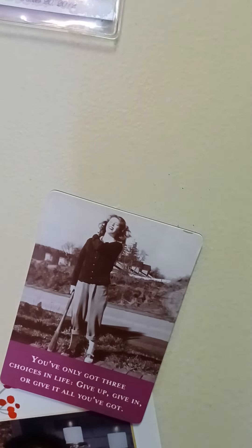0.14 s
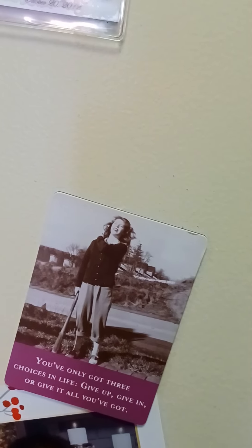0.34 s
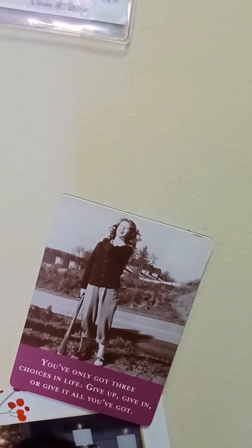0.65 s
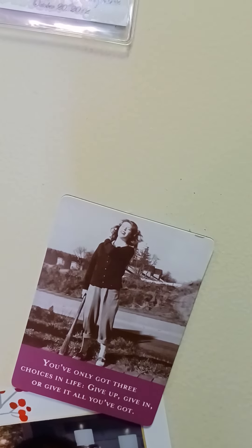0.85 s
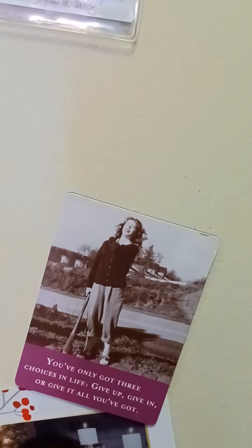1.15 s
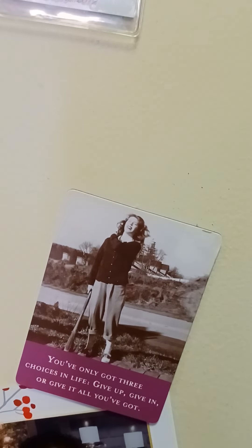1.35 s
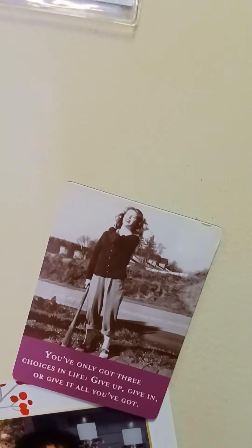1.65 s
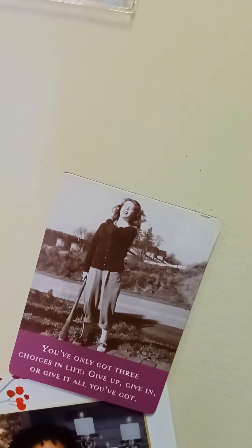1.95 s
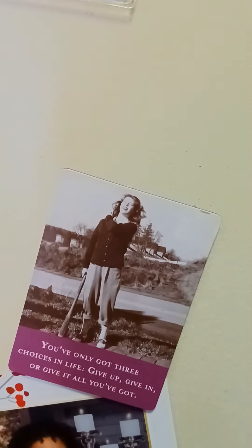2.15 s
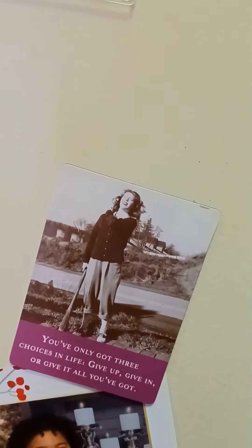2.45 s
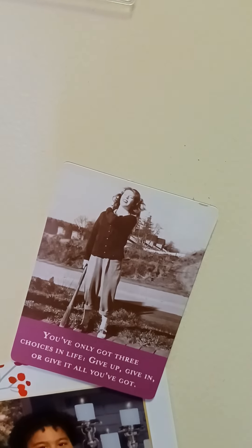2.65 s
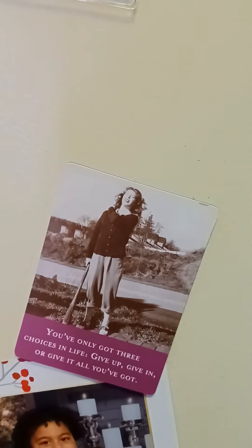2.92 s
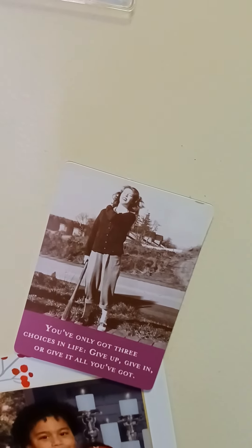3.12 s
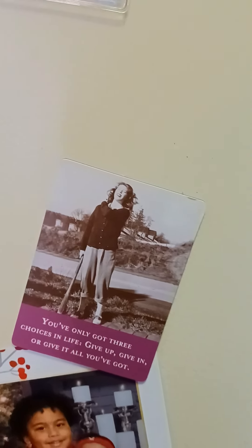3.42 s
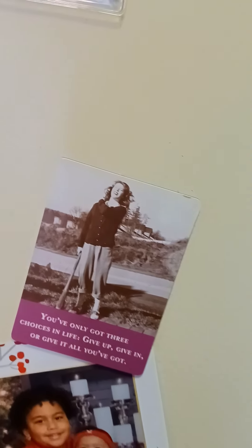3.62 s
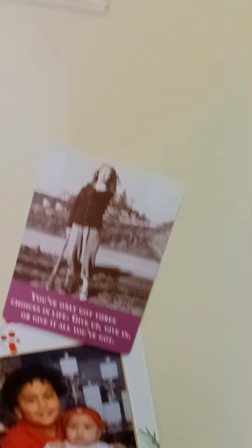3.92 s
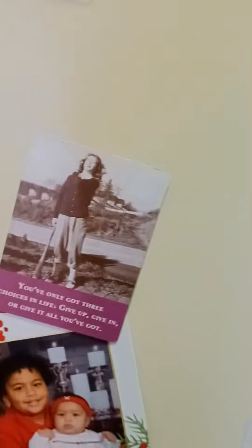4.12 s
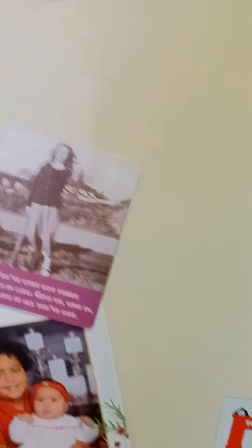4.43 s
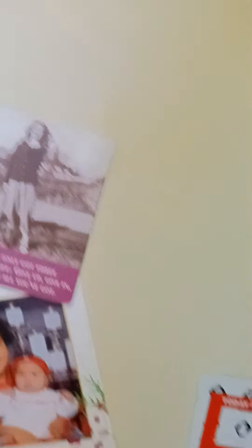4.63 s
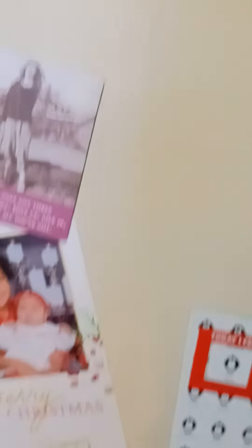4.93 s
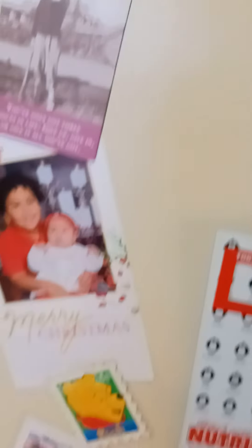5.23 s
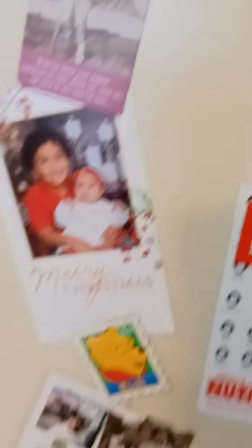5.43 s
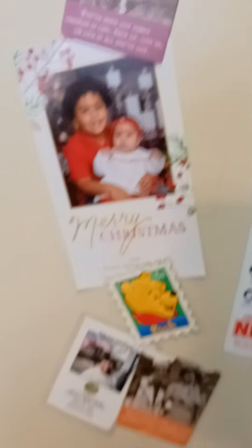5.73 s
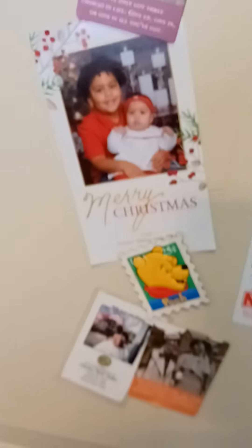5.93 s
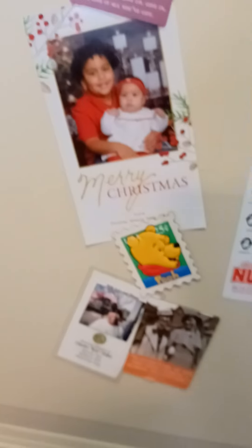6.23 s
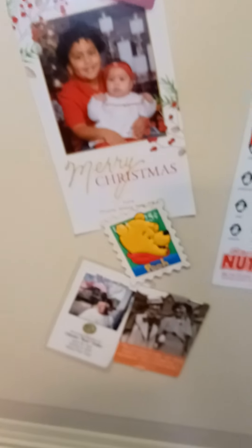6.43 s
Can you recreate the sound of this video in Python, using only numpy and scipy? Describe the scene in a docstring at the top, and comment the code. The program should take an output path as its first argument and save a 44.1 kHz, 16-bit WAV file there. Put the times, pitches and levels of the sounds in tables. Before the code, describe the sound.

A refrigerator hums with a low wavering drone in a quiet kitchen while brief shoe scuffs and gritty ticks sound midway, then only the hum remains.

```python
"""A refrigerator runs in a quiet kitchen: fan orders locked to one rotation make a wavering blade-tone hum,
wavering sines the motor and mains buzz, shaped noise the low air rush and faint hiss.
From 3.6 s someone to the right shuffles: noise under stroke envelopes scuffs, struck resonances tick as grit.
Amid this, near 4.8 s, the low rumble swells once; faint motor whines surge at 5.3 and 5.7 s.
The scuffs die out soon after 5.6 s and the refrigerator runs on."""
import sys
import numpy as np
from scipy import signal
from scipy.fft import rfft, irfft
from scipy.io import wavfile

SR = 44100
rng = np.random.default_rng(int(sys.argv[2]) if len(sys.argv) > 2 else 0)


def transcribe(u):
    """Save the signal u as a 16-bit wav file named by the first command-line argument.

    u: samples, shape (n,) or (channels, n), limited to [-1, 1]; the rate is SR.
    q: integer samples, one column per channel.
    """
    v = np.clip(np.atleast_2d(u).T, -1, 1)
    q = np.round(v * 32767).astype(np.int16)
    wavfile.write(sys.argv[1], SR, q)


N = 289737
TIME = np.arange(N) / SR
HZ = np.maximum(np.fft.rfftfreq(N, 1 / SR), 1)


def amp(db):
    """dB to gain."""
    return 10 ** (np.asarray(db) / 20)


def rms_one(x):
    """Scale so that the mean of the channels has rms 1."""
    mono = np.atleast_2d(x).mean(axis=0)
    return x / np.sqrt(np.mean(mono ** 2) + 1e-20)


def in_time(rows):
    """Columns of a (seconds, ..) curve at every sample."""
    s, *columns = np.transpose(rows)
    return [np.interp(TIME, s, column) for column in columns]


def at_hz(points):
    """A (Hz, value) curve on the frequency grid, linear in log frequency."""
    hz, value = np.transpose(points)
    return np.interp(np.log(HZ), np.log(hz), value)


def coloured(x, gain):
    """Filter by a gain on the frequency grid."""
    return irfft(rfft(x) * gain, N)


def drift(rate_hz):
    """Slow random wander of rms 1: white noise low-passed near rate_hz."""
    return rms_one(coloured(rng.standard_normal(N), 1 / (1 + (HZ / rate_hz) ** 2)))


def sided(left_right_db):
    """Left and right gains for a left-right level difference."""
    half_db = np.atleast_1d(left_right_db) / 2
    return np.stack([amp(half_db), amp(-half_db)])


def tone(phase, rms_db, pan_db=0, lead_rad=.23):
    """A sine of the given level from a random start phase; the left channel leads in phase."""
    start = rng.uniform(0, 2 * np.pi)
    wave = np.sin(phase + start + [[lead_rad], [0]])
    return np.sqrt(2) * amp(rms_db) * wave * sided(pan_db)


def resonance(x, hz, width_hz):
    """Two-pole ring: a unit click rings with height about 1 and decays at the rate its width gives."""
    r = np.exp(-np.pi * width_hz / SR)
    w = 2 * np.pi * hz / SR
    return signal.lfilter([0, np.sin(w)], [1, -2 * r * np.cos(w), r * r], x)


def reflections(t60_s):
    """Dense echoes of a small room: decaying noise, independent per channel, energy 1."""
    age = np.arange(SR // 3) / SR
    tail = rng.standard_normal((2, len(age))) * amp(-60 * age / t60_s)
    return tail / np.sqrt(np.sum(tail ** 2, axis=1, keepdims=True))


def fan():
    """Blade tone, weaker shaft orders locked to the same rotation, and turbulence round the blade tone."""
    # Blade-tone pitch. Each row: time in seconds, frequency in Hz.
    blade_hz = [(0, 133.13), (3.0, 133.13), (3.5, 132.88), (5.4, 132.9), (6.57, 133.03)]
    # Blade-tone level before waver. Each row: time in seconds, rms level in dB.
    blade_level = [(0.0, -44.5), (0.03, -38.5), (0.44, -40.5), (0.49, -35.5), (0.57, -38.5), (0.8, -37),
                   (0.86, -41.5), (1.06, -34.5), (1.66, -38.5), (1.76, -34.5), (1.96, -37.5), (2.01, -44),
                   (2.12, -36), (2.23, -35.5), (2.45, -38.5), (2.53, -52), (2.58, -41.5), (2.76, -38),
                   (3.24, -36), (3.27, -41.5), (3.5, -37.5), (4.21, -37), (4.35, -35), (4.5, -37),
                   (4.55, -47), (4.68, -36.5), (4.98, -35), (5.05, -42.5), (5.56, -35), (5.76, -40),
                   (5.87, -48), (5.93, -35.5), (6.06, -44.5), (6.17, -37), (6.44, -40.5), (6.57, -37)]
    # Shaft orders. Each row: multiple of the turning rate, mean rms level in dB, left-right in dB.
    shaft_orders = [(6, -64, 2), (8, -60, .6), (10, -62, 1.4), (12, -62, -2.3), (14, -73, -1.6),
                    (22, -75, 2), (24, -76, .4), (33, -80, -4)]
    blades = 11
    waver_db, waver_hz = 0.96, 7.4
    flutter_hz, flutter_width_hz, flutter_rms_db = 133, 12, -56

    turn = 2 * np.pi * np.cumsum(in_time(blade_hz)[0]) / SR / blades
    blade_phase = blades * turn + 0.05 * drift(24)
    blade_db = in_time(blade_level)[0] + waver_db * drift(waver_hz)
    out = tone(blade_phase, blade_db, pan_db=-0.96)
    for order, db, pan_db in shaft_orders:
        out += tone(order * turn, db + 0.5 * drift(2.6), pan_db)
    flutter_band = 1 / (1 + ((HZ - flutter_hz) / flutter_width_hz) ** 2)
    flutter = rms_one(coloured(rng.standard_normal(N), flutter_band))
    return out + amp(flutter_rms_db) * flutter


def strokes(rows, rise_share=1, fall_share=1, late_db=0):
    """Stereo gain of a group of strokes: each rises, holds, falls and leaves a room tail; their powers add.

    late_db is the climb, in dB at the nominal rise, by which the top is delayed."""
    tail_db, tail_fall_db_per_s = -18, 241
    power = np.zeros((2, N))
    for s, db, rise, hold, fall, pan_db in rows:
        age = TIME - s - late_db / rise
        early = np.maximum(-age, 0)
        late = np.maximum(age - abs(hold), 0)
        direct = amp(db - rise_share * rise * early - fall_share * fall * late) * sided(pan_db)
        tail = (age > 0) * amp(db + tail_db - tail_fall_db_per_s * late)
        power += direct ** 2 + tail ** 2
    return np.sqrt(power)


def scuffs():
    """Sole friction as dense noise grains; in each stroke the treble tops first, the body of the sole last."""
    # Strokes of the sole, grouped by stretches of like colour. Each row: nominal top in seconds,
    # level in dB, nominal rise in dB/s, hold in seconds, nominal fall in dB/s, left-right in dB.
    stroke_groups = [
        [(3.644, -86, 262, .02, 202, -2), (3.678, -74.5, 500, .003, 352, -2), (3.83, -80, 56, 0.023, 293, 0)],
        [(3.905, -63.5, 204, 0.047, 300, -4)],
        [(4.272, -50, 545, 0.014, 378, -2), (4.37, -76, 100, .03, 200, -1)],
        [(4.412, -69, 398, .008, 190, 1), (4.566, -75, 160, .005, 113, 0.1), (4.68, -89, 181, .01, 401, 3)],
        [(4.692, -57.5, 6000, 0.0022, 260, -.5), (4.745, -70, 802, 0.0044, 301.5, -3),
         (4.96, -82, 19.5, .01, 299.5, -4)],
        [(5.0, -69, 496, 0.11, 202, -4.5), (5.15, -53.5, 168, 0.0054, 305, -3.5),
         (5.183, -51.5, 400, 0.004, 600, 0.5)],
        [(5.362, -67.5, 2500, 0.025, 197, 2), (5.42, -62.5, 232, 0.016, 600, -1)],
        [(5.448, -46, 498, 0.025, 373, 0), (5.56, -68.5, 300, 0.0035, 208, -3)],
    ]
    # Colour of each stretch of scuffing. Each row: frequency in Hz, relative density in dB.
    stretch_colours = [
        [(2000, -26.5), (3000, -7), (4500, -14), (6000, -8), (7500, 3.5), (9000, -6), (15600, -12)],
        [(710, -32.5), (1200, -8.5), (1780, -4), (2570, -8.5), (3020, -3), (4160, -8.5), (7430, -2), (9300, -7),
         (13000, -10), (15600, -5.5)],
        [(350, -35), (600, -7), (716, -7), (767, -20), (843, -5.5), (993, -14), (1340, -4), (1910, -3),
         (2340, -4.5), (2950, -4.5), (5840, -11), (10600, -15), (12200, -15), (15600, -17)],
        [(820, -32), (1400, -2.5), (1630, -2.5), (2230, -14), (2410, -11), (2640, -15), (4030, -14.5),
         (7460, -9.5), (9500, -18), (15600, -16.5)],
        [(760, -37.5), (1300, -8.5), (1620, -1.5), (2230, -10.5), (2480, -9.5), (6050, -2.5), (7210, 0.5),
         (9450, -7.5), (11500, -8), (15600, -17)],
        [(760, -50.5), (1300, -15.5), (1540, -2.5), (2030, 3.5), (2370, -2), (3450, 0.5), (5740, -10.5),
         (7440, -6), (9070, -12), (13500, -11), (15600, -11.5)],
        [(820, -46), (1400, -7.5), (1640, -17.5), (1950, 3), (2440, -26.5), (2920, -26), (3010, -2),
         (3170, -0.5), (4280, -11), (7610, -7), (15600, -21)],
        [(470, -48), (800, -20), (1350, -11.5), (1470, -21.5), (1710, -4.5), (2480, -8.5), (2980, -6),
         (3870, -2), (5760, -7), (6130, -8.5), (7390, -8), (8790, -12.5), (13100, -17), (15600, -20.5)],
    ]
    # Shading, mostly of the left channel. Each row: frequency in Hz, left-right in dB.
    side_shade = [(1500, -3), (3000, -3.2), (6000, 1.5), (8000, -2), (10000, -4), (15000, -8.5)]
    treble_hz, body_hz = 6000, 2500

    out = np.zeros((2, N))
    shade = sided(at_hz(side_shade))
    treble_gain = HZ ** 4 / (HZ ** 4 + treble_hz ** 4)
    body_gain = body_hz ** 4 / (HZ ** 4 + body_hz ** 4)
    for rows, colour in zip(stroke_groups, stretch_colours):
        echoes = 1 + .35 * rfft(reflections(t60_s=.15), N)
        grain_db = 1.8 * rng.exponential(1, N) + 1.5 * drift(60)
        grains = rng.standard_normal((2, N)) * amp(grain_db)
        rub = rms_one(coloured(grains, amp(at_hz(colour)) * shade * echoes))
        treble = coloured(rub, treble_gain)
        body = coloured(rub, body_gain)
        out += strokes(rows) * (rub - treble - body)
        out += strokes(rows, rise_share=0.91, fall_share=0.86, late_db=-1.5) * treble
        out += strokes(rows, rise_share=0.88, fall_share=0.78, late_db=4.8) * body
    return out


def ticks():
    """Grit snaps under the sole: each click rings three resonances and leaves a short room tail."""
    # Each row: time in seconds, click level in dB ahead of the resonances.
    grit_clicks = [(3.6257, -69), (3.64, -57.5), (3.6744, -67), (3.6775, -60.5), (3.7506, -67),
                   (3.7894, -67), (3.8076, -62), (3.8374, -60), (3.8786, -53), (4.28, -45), (4.404, -54),
                   (4.5311, -71), (4.565, -65), (4.6927, -63), (4.7454, -52), (5.0015, -51.5),
                   (5.1827, -45), (5.3564, -64)]
    # Ringing of the grit. Each row: frequency in Hz, width in Hz, mean relative level in dB.
    grit_modes = [(3200, 790, -9.5), (7500, 4300, -2.5), (12000, 3700, -9.5)]
    room_t60_s, room_db = .15, 6

    s, click_db = np.transpose(grit_clicks)
    at = np.round(s * SR).astype(int)
    chance = rng.standard_normal((len(grit_clicks), len(grit_modes)))
    snaps = np.zeros(N)
    for k, (hz, width_hz, db) in enumerate(grit_modes):
        clicks = np.full(N, 1e-18)  # avoids denormals
        clicks[at] = amp(click_db + db + 1.3 * chance[:, k])
        snaps += resonance(clicks, hz, width_hz)
    echoes = signal.fftconvolve(snaps[None], reflections(room_t60_s), axes=1)[:, :N]
    return snaps * sided(-6.) + amp(room_db) * echoes * sided(-3.)


def motors():
    """Motor and mains sines: wavering tones, steady whistles, unsteady whines and a low tone that comes and goes."""
    # Motor and mains tones. Each row: frequency in Hz, mean rms level in dB.
    hum_tones = [(93.77, -61), (106.8, -73), (159.56, -70), (240.0, -72), (292.4, -74), (360.1, -79)]
    # Faint steady whistles. Each row: frequency in Hz, rms level in dB.
    whistles = [(905.4, -92), (2274.6, -103), (2359.1, -103), (4321.4, -110), (4921.9, -110),
                (5101.9, -109), (5822.3, -109)]
    # Faint motor whines. Each row: time in seconds, lower rms level in dB, upper rms level in dB.
    whine_levels = [(0, -87, -96.5), (2.2, -84, -92), (3.6, -88, -88), (4.0, -79.5, -94), (5.1, -82, -91),
                    (5.3, -70, -78), (5.45, -88, -78), (5.67, -70, -93), (5.95, -79, -89.5),
                    (6.57, -86, -89.5)]
    # Each row: time in seconds, rms level in dB.
    low_tone_level = [(0.0, -75), (1.13, -69), (2.2, -77), (3.16, -80), (3.7, -63.5), (4.89, -72.5),
                      (5.2, -82), (6.57, -77)]
    whine_hz, whine_wander_rad = (703.6, 1307.8), (1.3, .6)
    low_tone_hz = 53.8

    radians_per_hz = 2 * np.pi * TIME
    out = tone(radians_per_hz * low_tone_hz, in_time(low_tone_level)[0])
    for hz, db in hum_tones:
        out += tone(radians_per_hz * hz, db + 3.0 * drift(3))
    for hz, db in whistles:
        out += tone(radians_per_hz * hz, db, lead_rad=1.9)
    for hz, db, wander_rad in zip(whine_hz, in_time(whine_levels), whine_wander_rad):
        out += tone(radians_per_hz * hz + wander_rad * drift(11.0), db, pan_db=2.0, lead_rad=1.6)
    return out


def rush():
    """Air noise exciting cabinet and room; its rumble swells once.

    The channels are most alike near 130 Hz, less so below and above, opposed near 7 kHz."""
    # Air and cabinet rumble. Each row: frequency in Hz, relative density in dB before tilt and peaks.
    rush_colour = [(20, -44.5), (40, -26), (60, -9.5), (88, -9.5), (115, -11), (160, -5.5), (190, -11),
                   (235, -3.5), (330, -8.5), (430, -13), (470, -12), (560, -18.5), (900, -22.5),
                   (1500, -34)]
    # Level ahead of the swell. Each row: time in seconds, rms level in dB.
    rush_level = [(0, -57), (1.5, -55.5), (2.5, -57), (4.0, -55.5), (4.6, -58), (4.9, -54), (5.9, -58),
                  (6.57, -56.5)]
    # Cabinet and room resonances. Each row: frequency in Hz, width in Hz, height in dB.
    cabinet_modes = [(218.7, 9, 5.5), (243.4, 2.7, 5.5), (269, 31, 2.5), (289, 13, 0), (312, 6.8, 5.5),
                     (357, 20, 2.5), (401.4, 17, 6), (477, 14, 5), (554, 27, 2.5), (600, 20, 3.5),
                     (646, 8.7, 2), (694, 16, 4), (750, 10, 2.5), (914, 11, 4.5)]
    likeness = [(60, 0.29), (130, 1), (290, 0.66), (640, 0.19), (1410, 0.33), (3100, -0.24), (6820, -1.1),
                (15000, -0.02)]
    rumble_cutoff_hz = 406
    swell_s, swell_db, swell_width_s = 4.77, 9.5, 0.099

    mid, side = rng.standard_normal((2, N))
    peaks_db = sum(db / (1 + (2 * (HZ - hz) / width_hz) ** 2) for hz, width_hz, db in cabinet_modes)
    tilt_db = -9.94 * np.log2(1 + HZ / 1500)
    colour = amp(at_hz(rush_colour) + peaks_db + tilt_db)
    alike = np.clip(at_hz(likeness), -1, 1)
    common = coloured(mid, colour * np.sqrt(1 + alike))
    opposed = coloured(side, colour * np.sqrt(1 - alike)) * [[1], [-1]]
    air = rms_one(common + opposed)
    rumble = coloured(air, 1 / (1 + (HZ / rumble_cutoff_hz) ** 4))
    rumble_db = swell_db * np.exp(-((TIME - swell_s) / swell_width_s) ** 2)
    return amp(in_time(rush_level)[0]) * (air - rumble + amp(rumble_db) * rumble)


def hiss():
    """Far room tone and microphone hiss: noise independent per channel, its spectrum finely rippled by echoes."""
    # Each row: frequency in Hz, relative density in dB.
    hiss_colour = [(710, -28.5), (1200, -3), (1990, -9), (2140, -11), (2430, -8), (2650, -11),
                   (4120, -17.5), (5050, -16), (6120, -21.5), (8270, -16.5), (9400, -21.5), (13000, -15),
                   (15600, -19)]
    hiss_rms_db = -81.5
    ripple = 1 + 0.67 * rfft(reflections(t60_s=0.26), N)
    noise = coloured(rng.standard_normal((2, N)), amp(at_hz(hiss_colour)) * ripple)
    return amp(hiss_rms_db) * rms_one(noise)


def scene():
    """The refrigerator, the shuffling feet and the room."""
    return fan() + scuffs() + ticks() + motors() + rush() + hiss()


def record(dry):
    """Steep elliptic low-pass at 15750 Hz: 0.3 dB ripple, 70 dB stopband."""
    low_pass = signal.ellip(14, .3, 70, 15750, fs=SR, output="sos")
    return signal.sosfilt(low_pass, dry)


dry = scene()
out = record(dry)
transcribe(out)
```